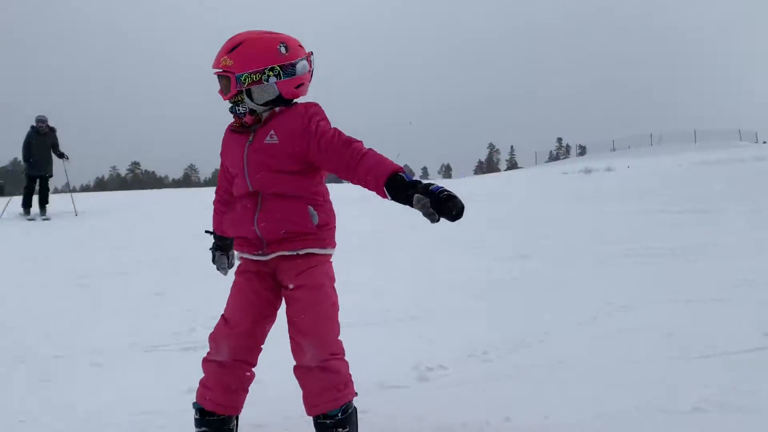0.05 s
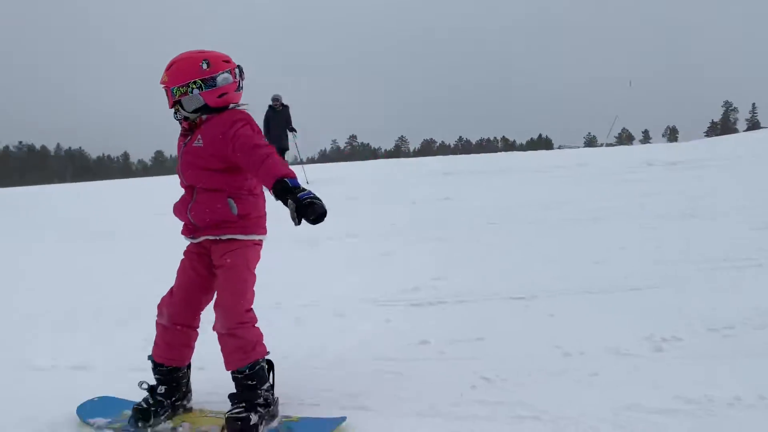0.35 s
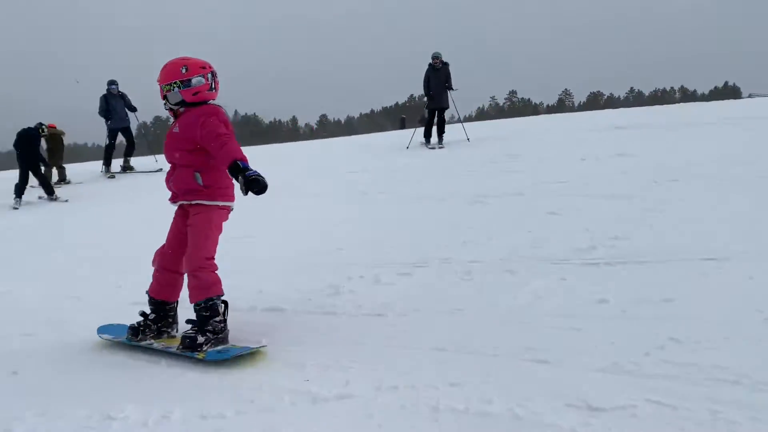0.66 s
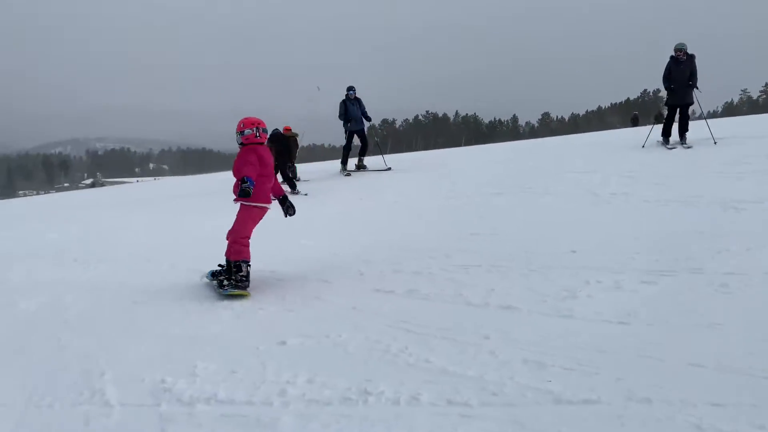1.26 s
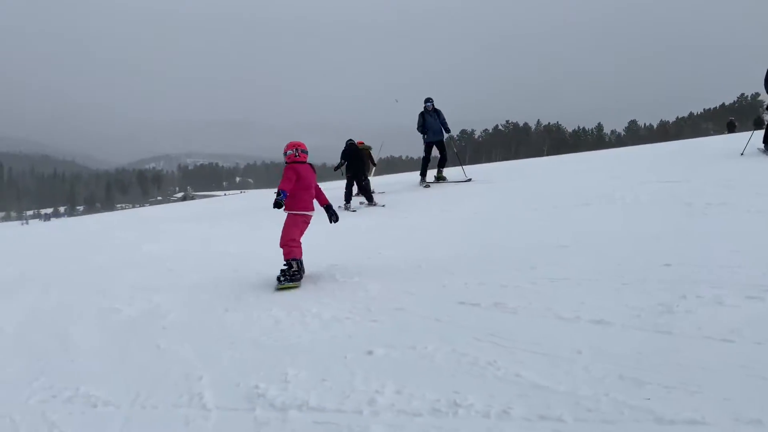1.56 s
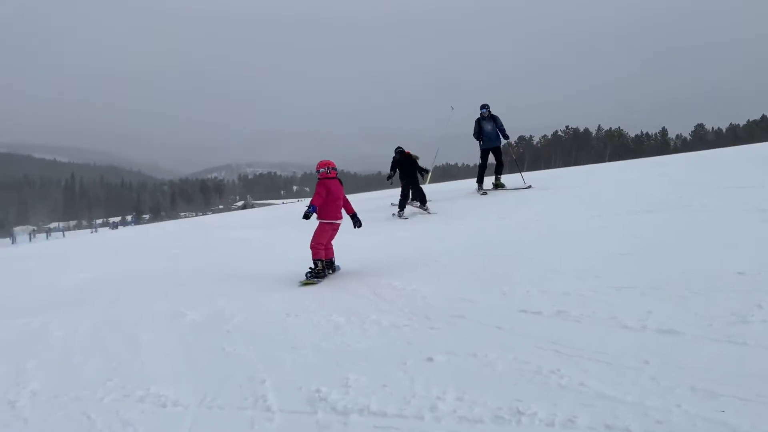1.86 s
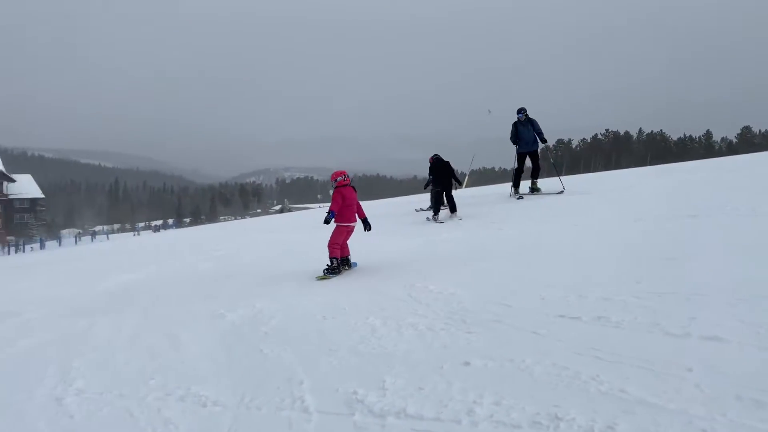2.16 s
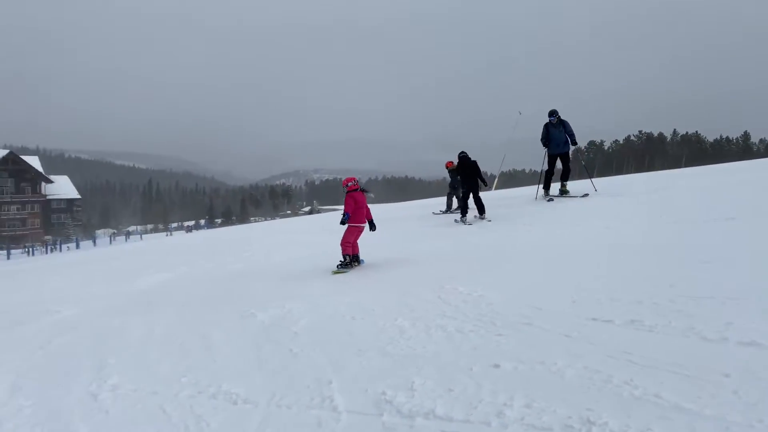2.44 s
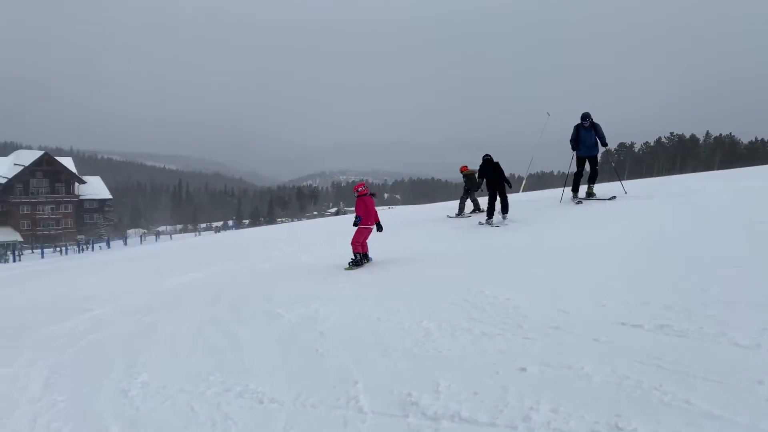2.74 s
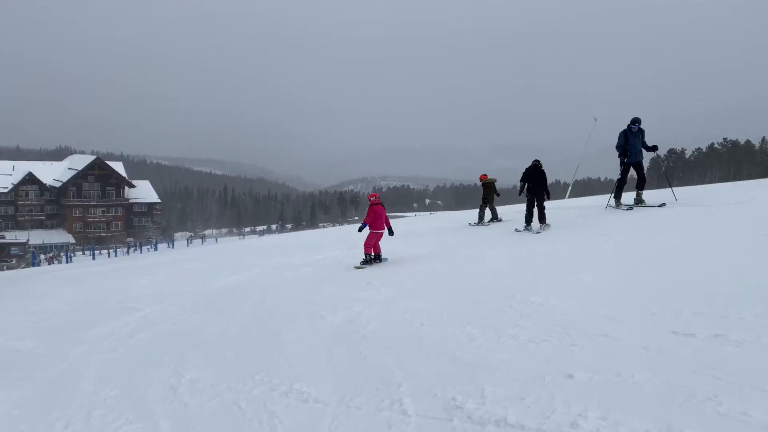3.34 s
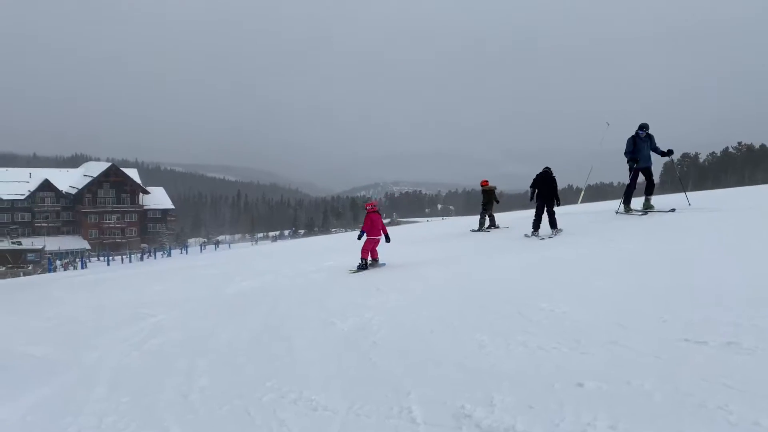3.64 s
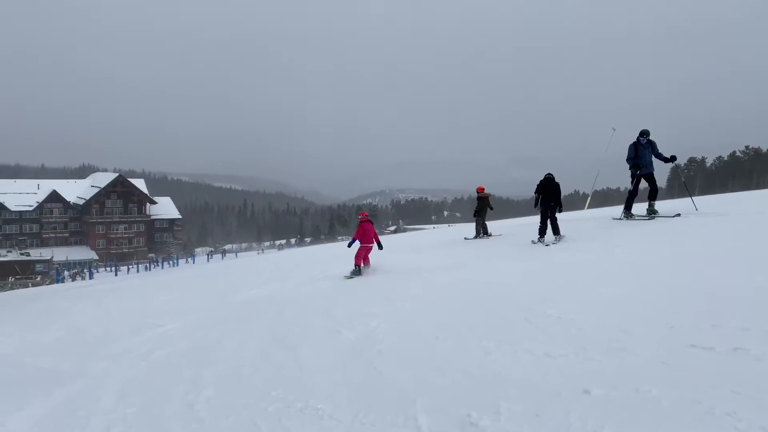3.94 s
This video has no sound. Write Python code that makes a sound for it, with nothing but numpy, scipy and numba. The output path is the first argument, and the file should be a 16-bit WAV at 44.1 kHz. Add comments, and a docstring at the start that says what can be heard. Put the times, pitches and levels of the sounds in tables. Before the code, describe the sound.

A snowboard scrapes by on packed snow and fades into fluttering wind on the microphone.

```python
"""On a ski slope, a small snowboard scrapes past over packed snow and slides away downhill.
Grains breaking under its base hiss, its edges spray snow, and it clacks over icy crumbs.
Turbulent wind then buffets the two microphone ports, each on its own, with a fluttering rumble
that has no deep bass. Faint ticks, soft bumps and the hiss of distant skis lie behind it."""
import sys
import numpy as np
from scipy import signal
from scipy.fft import rfft, irfft
from scipy.io import wavfile
from scipy.ndimage import uniform_filter1d, map_coordinates
from numba import njit

SR = 44100
rng = np.random.default_rng(int(sys.argv[2]) if len(sys.argv) > 2 else 0)


def master_out(mix):
    """Clip the mix to full scale and print it as 16-bit PCM to the path in sys.argv[1]."""
    frames = np.transpose(np.atleast_2d(mix))
    ceiling = np.clip(frames, -1, 1)
    pcm = np.round(ceiling * 32767).astype(np.int16)
    wavfile.write(sys.argv[1], SR, pcm)


N = 176400
T = np.arange(N) / SR
BIN_HZ = np.arange(N // 2 + 1) * SR / N
LEAD_S = .02  # silence ahead of an impact, room for the bass cut to ring backwards


def undb(db):
    """Amplitude ratio for a level in decibels."""
    return 10 ** (np.asarray(db) / 20)


def curve(rows, column=1):
    """Linear interpolation of one column of a timed table, at every sample."""
    rows = np.array(rows)
    return np.interp(T, rows[:, 0], rows[:, column])


def unit(x):
    """Normalisation to rms 1."""
    return x / np.sqrt(np.mean(x ** 2))


def noise():
    """Uncorrelated white noise for the two ports."""
    return rng.standard_normal((2, N))


def impulses(per_s):
    """A Poisson train of impulses of random sign for each port."""
    return (rng.random((2, N)) < per_s / SR) * np.sign(noise())


def walk(per_s):
    """Slow random modulation with a spread near 1, renewed at the given rate."""
    return 1.2 * np.interp(T * per_s, np.arange(8000), rng.standard_normal(8000))


def pan(db):
    """Constant-power gains for a level difference, left minus right."""
    gains = undb(np.array([[.5], [-.5]]) * db)
    return gains / np.sqrt(np.mean(gains ** 2, axis=0))


def per_bin(points):
    """A spectral envelope (f/Hz, level/dB), interpolated in log frequency at every bin."""
    hz, db = np.array(points).T
    return np.interp(np.log(BIN_HZ + 1), np.log(hz), db)


def colour(x, points):
    """Spectral shaping by an envelope, to rms 1."""
    return unit(irfft(rfft(x) * undb(per_bin(points)), N))


@njit
def svf(x, g, damping, high):
    """Two-pole state-variable filter; g = tan(pi f / SR) sets its moving corner."""
    y, band_state, low_state = np.empty(len(x)), 0., 0.
    for i in range(len(x)):
        mid = (band_state + g[i] * (x[i] - low_state)) / (1 + g[i] * (g[i] + damping))
        low = low_state + g[i] * mid
        band_state, low_state = 2 * mid - band_state, 2 * low - low_state
        y[i] = x[i] - damping * mid - low if high else low
    return y


def cut(x, hz, order, high=False):
    """Maximally flat low-pass or high-pass on both channels."""
    g = np.tan(np.pi * np.clip(hz, 20, .45 * SR) / SR) * np.ones(x.shape[1])
    for damping in 2 * np.sin(np.pi * (np.arange(order // 2) + .5) / order):
        x = np.array([svf(side + 1e-18, g, damping, high) for side in x])
    return x


def band(x, hz, width):
    """Band-pass with corners a factor 1 + width / 2 either side of the centre."""
    ratio = 1 + width / 2
    return cut(cut(x, hz * ratio, order=4), hz / ratio, order=2, high=True)


def low_cut(x, hz):
    """Zero-phase high-pass: run forwards and backwards, it keeps pulses compact."""
    hz = hz * np.ones(x.shape[1])
    forwards = cut(x, hz, order=14, high=True)
    return cut(forwards[:, ::-1], hz[::-1], order=14, high=True)[:, ::-1]


def resonance(x, hz, q):
    """Response of one damped mode of quality factor q."""
    return signal.lfilter(*signal.iirpeak(hz, q, fs=SR), x)


def burst(decay_s):
    """Exponentially decaying noise on each port."""
    return rng.standard_normal((2, 4096)) * np.exp(-T[:4096] / decay_s)


def blow(decay_s, push_db=13):
    """Impulsive excitation: a short silence, a sharp push on each port, then its dying wake."""
    x = burst(decay_s)
    x[:, 0] = undb(push_db) * np.array([1, rng.choice([1, 1, -1])])
    return np.pad(x, ((0, 0), (int(LEAD_S * SR), 0)))


def add(out, x, start_s, peak_db, pan_db=0):
    """Superposition: a transient is scaled to its peak level, panned and mixed in."""
    i = int(start_s * SR)
    x = x / np.abs(x).max(axis=1, keepdims=True) * undb(peak_db) * pan(pan_db)
    out[:, i:i + x.shape[1]] += x[:, :N - i]


def crosstalk(x, cross_db=-22, lag_samples=3):
    """Path difference: part of the snow sound reaches both ports, the left a little later."""
    crossed = np.array([np.roll(x[1], lag_samples), np.roll(x[0], -lag_samples)])
    return unit(x + undb(cross_db) * crossed)


def snowboard():
    """Friction noise: countless grains break under the base; the hiss dulls as the board moves off."""
    # the board's passage: t/s, level/dB, tilt/(dB per octave)
    glide = [(0, -41, -1.5), (.14, -39, 0.4), (.29, -40.5, 1.85), (.39, -43, 0.2), (.56, -43.5, -0.8),
             (.68, -45, 0), (.77, -48.5, 0), (.86, -42.5, -5), (.95, -45.5, -1.2), (1.05, -45.5, -2),
             (1.22, -48, -1), (1.35, -57, -1), (1.7, -59.5, 0.5), (4, -64, -9.5)]
    # spectrum of scraped snow: f/Hz, level/dB
    snow_spectrum = [(120, 10.5), (300, -10.5), (500, 2), (800, 4), (1100, 1), (1500, -1.5), (2000, -4.5),
                     (3000, -3.5), (3900, -2.5), (4800, -7.5), (6600, -4), (8200, -12.5), (10500, -14),
                     (14000, -25.5), (15500, -27)]
    grains = impulses(per_s=2500) * undb(4 * np.minimum(rng.exponential(size=(2, N)), 5))
    scrape = crosstalk(noise() + undb(-4.5) * unit(grains))
    spectrum = rfft(colour(scrape, snow_spectrum))
    octaves = np.clip(np.log2((BIN_HZ + 1) / 2000), -2, 2)  # the tilt pivots on 2 kHz
    tilt, chatter, out = curve(glide, column=2), walk(44.9), 0
    for octave in np.unique(np.round(octaves)):
        part = irfft(spectrum * np.maximum(1 - np.abs(octaves - octave), 0), N)
        flutter_db = 1.03 * (chatter + walk(28.9))
        out = out + part * undb(tilt * octave + flutter_db)
    return out * undb(curve(glide))


def distant_skis():
    """Incoherent sources: the friction of distant skis merges into an even, slowly rising hiss."""
    # spectrum of the skis: f/Hz, level/dB
    ski_spectrum = [(300, 6.5), (700, 15), (1500, 6), (2500, 0), (3600, -2.5), (4500, -2), (5700, -3),
                    (6800, -8), (8200, -10), (10300, -7), (12000, -23.5), (14000, -11), (15500, -31)]
    # swell of their hiss: t/s, level/dB
    swell = [(0, -57), (1.6, -53.5), (2, -54), (2.6, -51), (3.2, -49.5), (3.5, -48.5), (4, -46)]
    return colour(crosstalk(noise()), ski_spectrum) * undb(curve(swell) + .5 * walk(5.07))


def shimmer(x, patch_hz=190.8, patch_s=.072, depth_db=4):
    """Spectral modulation: patches of hiss swell and fade as the snow under the edges changes."""
    hz, s, spectra = signal.stft(x, SR, nperseg=1024)
    grid = np.meshgrid(hz / patch_hz, s / patch_s, indexing="ij")
    fields = rng.standard_normal((2, 256, 256))
    patches = np.array([map_coordinates(field, grid, order=1, mode="mirror") for field in fields])
    return signal.istft(spectra * undb(depth_db * patches), SR, nperseg=1024)[1][:, :N]


def ports(x, ripple_hz=180.3, ripple_db=1.5):
    """Frequency response: each port colours the hiss with its own broad peaks and fine ripple."""
    # responses of the two ports: f/Hz, gain/dB
    left = [(200, 6), (700, 0.5), (1100, 2), (1800, 1.5), (2400, -3.5), (3400, 0), (4300, -2), (4900, 0),
            (5600, 2), (6400, 2), (7600, -1.5), (9000, 0), (15000, 0)]
    right = [(200, 6.5), (700, -3), (1100, -3), (1800, 2), (2400, 3.5), (3400, 0), (4300, 1), (5200, -5),
             (6000, -4.5), (6800, -1), (7600, -2), (9000, 0.5), (15000, 0)]
    ripple = [np.interp(BIN_HZ / ripple_hz, np.arange(512), row) for row in rng.standard_normal((2, 512))]
    response_db = np.array([per_bin(left), per_bin(right)]) + ripple_db * np.array(ripple)
    return irfft(rfft(x) * undb(response_db), N)


def wind(low_hz, flutter_hz=71.13, cap_db=12.5, octaves_per_db=.02):
    """Turbulent pressure: eddies strike each port in fluttering clusters and make it ring briefly."""
    # wind at the ports: t/s, level/dB, left minus right/dB
    strength = [(0, -50, -7), (.55, -78, 9), (.66, -45, 6.5), (.82, -54.5, -5), (1.01, -39.5, 7),
                (1.09, -50, -5), (1.17, -41, 0.5), (1.27, -45, -4), (1.35, -42, 4), (1.42, -41, 3),
                (1.53, -39, 0), (1.58, -48.5, -1), (1.67, -40.5, -1), (1.75, -33.5, -1.5), (1.8, -45, 3),
                (1.87, -34.5, 2), (1.955, -30, 15), (2.01, -42, 7), (2.12, -37, 1), (2.22, -39.5, 4.5),
                (2.35, -37.5, 1), (2.45, -39, 3.5), (2.6, -31.5, -0.5), (2.7, -38, -2), (2.79, -34, 1),
                (2.9, -36, 1), (3.04, -42.5, 3), (3.19, -36, -1), (3.26, -42, -2), (3.38, -49, 4.5),
                (3.455, -42.5, -3), (3.5, -27.5, 18), (3.545, -37.5, 3), (3.595, -37, 3), (3.64, -28, -1.5),
                (3.7, -38.5, 2.5), (3.82, -35.5, 1), (3.88, -33, 8.5), (4, -30.5, -2.5)]
    # gustiness of the air: t/s, factor on the depth of the clusters
    gustiness = [(0, 1.3), (1.4, 0.58), (2.2, 0.62), (2.5, 0.81), (2.9, 0.59), (3.2, 0.74), (4, 0.77)]
    # top of the rumble, higher as faster air makes smaller eddies: t/s, f/Hz
    upper_edge = [(0, 920), (1, 925), (1.35, 586), (1.8, 595), (1.97, 885), (2.2, 1140), (2.45, 1770),
                  (2.85, 1750), (3.05, 1240), (3.4, 1550), (3.5, 2030), (3.65, 1310), (3.8, 1570),
                  (4, 1640)]
    common_db = 3.5 * walk(flutter_hz)
    clusters_db = common_db + 3 * np.array([walk(flutter_hz), walk(flutter_hz)])
    eddies_db = 4 * np.array([walk(per_s=450), walk(per_s=450)])
    flutter_db = curve(gustiness) * clusters_db + eddies_db
    flutter_db = np.minimum(flutter_db, cap_db * np.tanh(np.abs(flutter_db) / cap_db))  # limits swells
    puffs = undb(-5) * unit(impulses(per_s=350))  # small sharp eddies
    rumble = cut((noise() + puffs) * undb(flutter_db), hz=1210, order=2)
    air = rumble + undb(-4) * noise() * undb(flutter_db)
    brightening = 2 ** (octaves_per_db * flutter_db.mean(axis=0))
    air = cut(air, curve(upper_edge) * brightening, order=4)
    air = low_cut(air + undb(-8.5) * resonance(air, hz=1354, q=1.8), low_hz)
    power = uniform_filter1d(np.mean(air ** 2, axis=0), int(.04 * SR))
    air = air / np.sqrt(power + 1e-12)  # evens out swells slower than about 40 ms
    return air * undb(curve(strength)) * pan(curve(strength, column=2))


def clacks():
    """Impact noise: the board knocks over icy crumbs, each brief contact exciting a broad band."""
    # knocks of the board: t/s, peak level/dB, lower f/Hz, upper f/Hz, decay time/s
    knocks = [(.688, -26.5, 900, 5500, 0.0018), (0.9107, -28.5, 1000, 4230, 0.0018),
              (.9305, -25, 950, 3530, 0.0017), (0.9541, -27.5, 800, 4500, 0.0016),
              (1.2653, -27, 700, 1710, 0.0017), (1.4804, -28, 800, 6800, 0.0018)]
    out = np.zeros((2, N))
    for s, db, low_hz, high_hz, decay_s in knocks:
        knock = cut(blow(decay_s), high_hz, order=6)
        add(out, low_cut(knock, low_hz), s - LEAD_S, db)
    return out


def buffets(low_hz):
    """Pressure pulses: each of the strongest eddies hits the ports as a brief dull slap."""
    # single eddies: t/s, peak level/dB, upper f/Hz, left minus right/dB, decay time of the wake/s
    eddies = [(.747, -28.5, 880, 7, 0.003), (1.2, -27.5, 755, -1, 0.0063), (1.316, -26, 600, 0, 0.0088),
              (1.338, -25, 595, 4, 0.0051), (1.4088, -27, 945, 2, 0.0018), (1.547, -24, 760, 4, 0.0095),
              (1.662, -26.5, 516, 5, 0.0069), (1.6941, -24, 715, 6, 0.0024), (1.7561, -25, 790, -1, 0.0014),
              (1.845, -22.5, 640, -4, 0.0087), (1.8783, -26, 760, 2, .003),
              (1.903, -24.5, 920, 2.5, 0.0016), (1.9228, -25, 1080, 19, 0.0019),
              (1.932, -19.5, 930, 6, 0.012), (1.9386, -22, 1000, -5, .007), (1.9705, -14, 1160, -6, 0.006),
              (2.0117, -20, 1040, -1.5, 0.0065), (2.06, -26, 1100, 2, 0.0033),
              (2.084, -25, 1270, 12, 0.0092), (2.0965, -18, 1270, -22, 0.0012),
              (2.11, -23, 1210, 15, 0.004), (2.1443, -27, 1180, -4, 0.0027),
              (2.1551, -19.5, 1250, 26, 0.00081), (2.233, -24.5, 1360, 17, 0.0015),
              (2.2788, -23.5, 1360, 1, 0.00042), (2.371, -21.5, 1630, 0, .005),
              (2.3996, -24, 1640, -8, 0.0016), (2.4631, -30, 1370, -2, .004),
              (2.559, -20, 1400, -1, 0.0046), (2.6024, -22, 1620, -7, 0.0076),
              (2.644, -25.5, 1820, -10, 0.0041), (2.6856, -24, 1600, -6, 0.0048),
              (2.7733, -16, 1760, 3, 0.0008), (2.8249, -21.5, 1710, 3, .003),
              (2.8473, -31, 1530, 13, 0.0011), (2.8673, -25, 1670, 14, 0.00071),
              (2.8991, -20.5, 1380, -3, 0.0022), (2.9314, -24, 1720, -11, 0.0013),
              (3.0838, -16, 1450, 4, 0.0031), (3.094, -23.5, 1460, 6, 0.0032),
              (3.191, -25, 1670, 3, 0.0054), (3.292, -26, 1370, 1, 0.0066),
              (3.361, -28.5, 1090, 2, 0.00097), (3.404, -30, 1050, -12, 0.0076),
              (3.4197, -25, 1250, 3, 0.0015), (3.4595, -17, 1900, 16, 0.0009),
              (3.466, -16, 1320, 21, 0.0028), (3.4762, -19, 1450, 13, 0.0034),
              (3.4827, -13.5, 1640, 23, 0.00067), (3.4894, -10.5, 2150, 6, 0.001),
              (3.5005, -23, 1970, -2, 0.0023), (3.5149, -19, 1720, 6, 0.0045),
              (3.5566, -27, 1300, 13, 0.0069), (3.6239, -19.5, 920, 2, 0.0088),
              (3.657, -17.5, 920, 21, 0.012), (3.7339, -21.5, 1390, -3, .003),
              (3.866, -19.5, 960, -5.5, 0.011), (3.8754, -17.5, 1270, -1, 0.0009),
              (3.9385, -16.5, 1530, 6, 0.0055), (3.9636, -21, 1310, -2, 0.0017),
              (3.9902, -17.5, 1670, 29, 0.006)]
    out = np.zeros((2, N))
    for s, db, hz, pan_db, decay_s in eddies:
        slap = low_cut(cut(blow(decay_s), hz, order=4), low_hz[int(s * SR)])
        slap = cut(slap, 1.48 * hz, order=2)  # the treble falls faster above this second corner
        add(out, slap, s - LEAD_S, db, pan_db)
    return out


def skids(rough_db=1.5):
    """Band-limited noise: an edge bites and sprays snow in a rough, bell-shaped swell."""
    # bites of the edge: t/s, level/dB, centre f/Hz as: t, half length/s, level, f
    bites = [(0.864, 0.045, -49.5, 5350), (1.174, 0.06, -45, 3310), (1.695, 0.23, -68, 5000),
             (2.337, 0.068, -52.5, 2750), (2.543, 0.62, -61, 5240)]
    out = 0
    for s, half_s, db, hz in bites:
        spray = unit(band(noise(), hz, width=.25)) * undb(db + rough_db * walk(120))
        out = out + spray * np.exp(-.5 * ((T - s) / half_s) ** 2)
    return out


def thumps(sag_per_s=15):
    """Gaussian tone pulses: soft low bumps on both ports, sagging in pitch."""
    # low bumps: t/s, level/dB, f/Hz, half length/s
    bumps = [(1.029, -40, 169, 0.0071), (2.578, -60, 50.4, 0.013)]
    out = 0
    for s, db, hz, half_s in bumps:
        t = T - s
        phase = 2 * np.pi * hz * t * (1 - sag_per_s * t / 2)
        out = out + undb(db) * np.sin(phase) * np.exp(-(t / half_s) ** 2)
    return out * pan(4.5)


def ticks():
    """Modal ringing: small hard clicks close by excite bright, quickly damped resonances."""
    # clicks: t/s, peak level/dB, centre f/Hz, decay time/s
    clicks = [(1.265, -39.5, 5400, 0.0012), (2.202, -39.5, 15000, .001), (2.237, -34.5, 14100, .00095),
              (2.9266, -40, 4400, 0.0013), (3.15, -30.5, 2410, 0.0014), (3.218, -32, 5840, 0.0016),
              (3.3092, -30, 5150, 0.0022)]
    # their modes: f/Hz, gain/dB, t60/s
    modes = [(2870, 14, 0.015), (5000, 5, .015), (6760, 9.5, 0.029)]
    out = np.zeros((2, N))
    for s, db, hz, decay_s in clicks:
        click = band(burst(decay_s), hz, width=2.46)
        ring = sum(undb(gain_db) * resonance(click, f, q=np.pi * f * t60 / np.log(1000))
                   for f, gain_db, t60 in modes)
        add(out, click + ring, s, db)
    return out


def scene():
    """Superposition at the ports of snow sounds and wind, both thin in the bass."""
    # moving bass cut of the hiss, wind and buffets: t/s, f/Hz
    lower_edge = [(0, 283), (.25, 273), (.48, 440), (.66, 263), (.8, 200), (.93, 244), (1.1, 364),
                  (1.32, 263), (1.6, 298), (1.7, 275), (2.06, 329), (2.16, 474), (2.28, 457), (2.45, 640),
                  (2.58, 420), (2.8, 513), (3.1, 484), (3.4, 554), (3.49, 400), (3.65, 355), (3.85, 410),
                  (4, 532)]
    low_hz = curve(lower_edge)
    hiss = shimmer(snowboard() + skids() + distant_skis())
    snow = cut(ports(hiss), low_hz, order=8, high=True)
    return snow + wind(low_hz) + buffets(low_hz) + clacks() + ticks() + thumps()


def record(dry, top_hz=15700):
    """Band limiting: a steep elliptic low-pass cuts the highest treble."""
    return signal.sosfilt(signal.ellip(8, .2, 70, top_hz, fs=SR, output="sos"), dry)


dry = scene()
out = record(dry)
master_out(out)
```